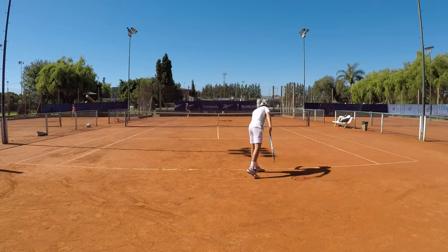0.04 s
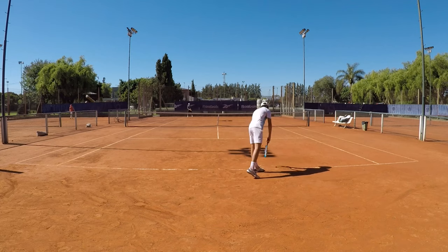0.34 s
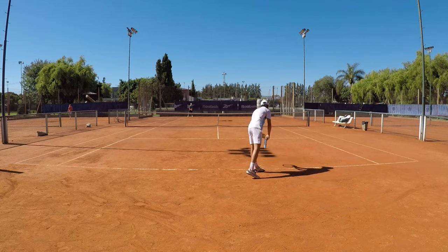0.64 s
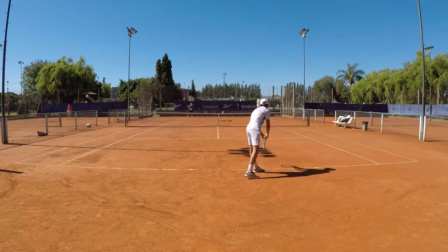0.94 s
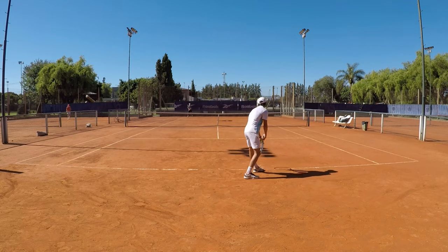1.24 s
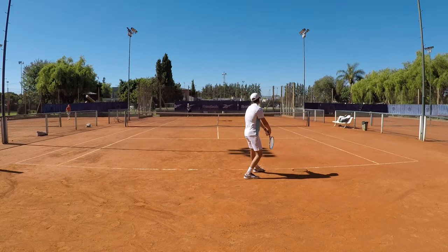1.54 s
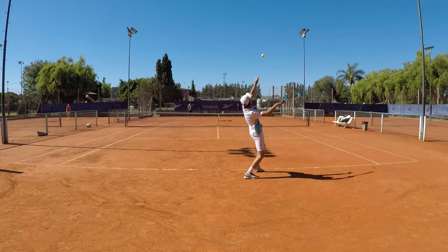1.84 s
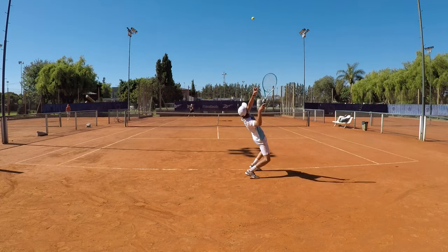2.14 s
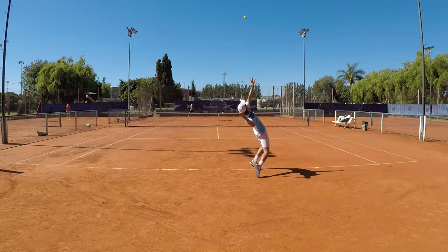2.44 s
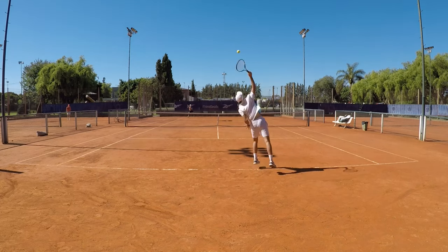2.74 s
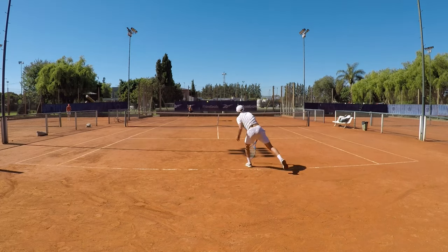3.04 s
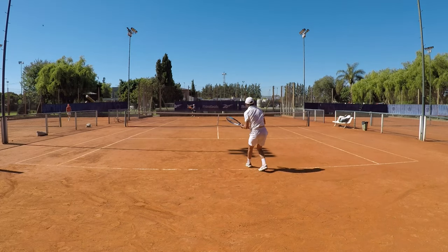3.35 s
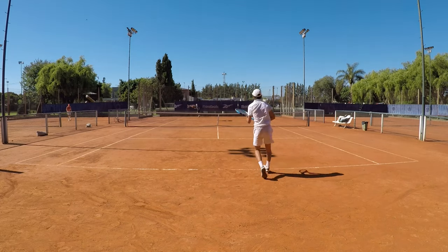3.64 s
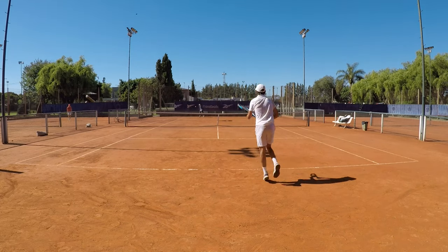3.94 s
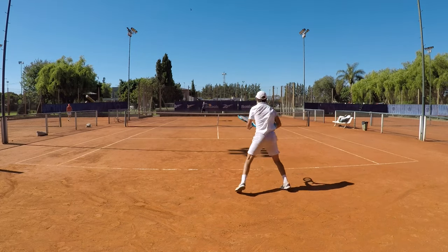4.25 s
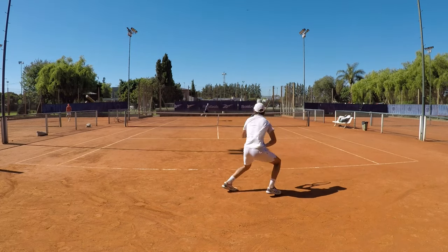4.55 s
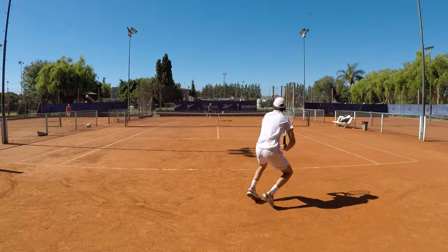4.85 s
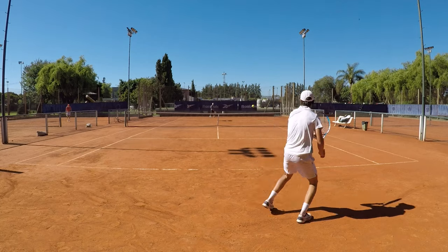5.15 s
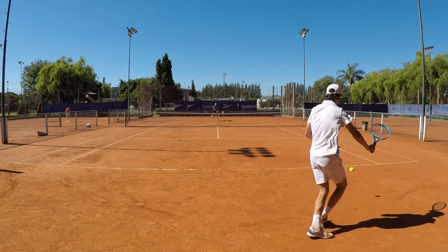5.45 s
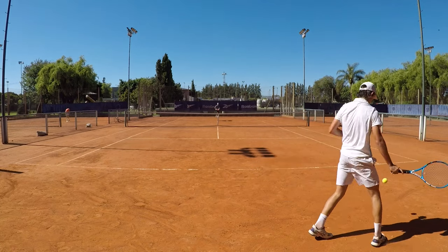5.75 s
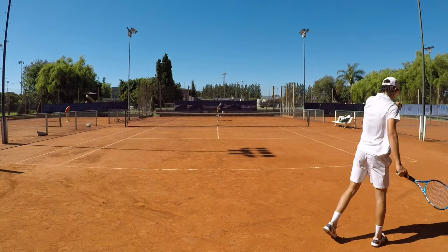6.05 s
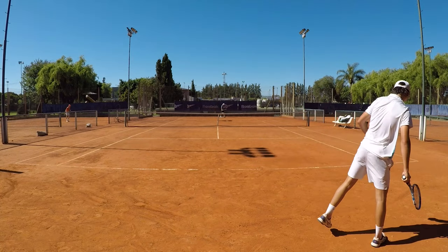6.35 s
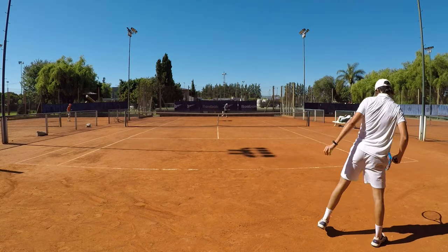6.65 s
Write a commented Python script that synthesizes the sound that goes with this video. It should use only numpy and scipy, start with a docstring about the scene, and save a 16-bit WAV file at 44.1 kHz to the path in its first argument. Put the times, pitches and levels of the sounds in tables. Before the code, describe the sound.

On an outdoor clay court, wind rumbles on the microphone over a hiss of leaves and a faint, distant machine hum. After a soft ball bounce and a pause, a tennis serve cracks loudly, with a racket swish and dull echoes. Shoes scuff and land on the grit. The ball then bounces close by on the right, is knocked by the racket and bounces again, before a low gust at the end.

```python
"""Tennis on an outdoor clay court

A player serves, lands, split-steps and stops the returned ball with his racket. Racket, ball and
soles ring in damped modes when struck; eddies whistle off the swung frame, and shoes scuff the grit.
Fences and trees send back dull echoes. Wind rumbles on the microphone over a hiss of leaves and
the hum of a far machine."""
import sys
import numpy as np
from scipy import signal
from scipy.fft import rfft, irfft, next_fast_len
from scipy.io import wavfile

SR = 44100
rng = np.random.default_rng(int(sys.argv[2]) if len(sys.argv) > 2 else 0)


def digitize_waveform(pressure):
    """Quantize a signal to 16-bit integers and store it at the path in sys.argv[1].

    Rows of a 2-D input are taken as channels; values are limited to [-1, 1].
    """
    field = np.atleast_2d(pressure).T
    bounded = np.clip(field, -1, 1)
    quanta = np.round(bounded * 32767).astype(np.int16)
    wavfile.write(sys.argv[1], SR, quanta)


N = 304411
T = np.arange(N) / SR

# Noise spectra: frequency_hz, relative_density_db
LEAF_SPECTRUM = [(150, -4.5), (380, 2.5), (560, -0.5), (700, -5.5), (950, -4), (1500, -10.5), (2200, -17),
                 (4000, -23.5), (5000, -25), (6300, -18), (8000, -26), (12500, -38.5), (15000, -51)]
WIND_SPECTRUM = [(15, -13), (25, -9), (45, -2), (65, 0), (95, -7.5), (135, -7), (170, -10.5), (240, -16.5),
                 (320, -24.5), (500, -41), (900, -82)]
EDDY_SPECTRUM = [(15, -40), (35, -7), (65, -1), (130, -9.5), (220, -27.5), (450, -50), (1200, -100)]
ECHO_SPECTRUM = [(150, 1), (400, -1.5), (620, 0), (1250, -7.5), (2000, -7), (4000, -3.5), (7000, -12),
                 (14000, -45)]
GRIT_SPECTRUM = [(400, 0.5), (1000, 4.5), (2000, 5), (3800, 3.5), (6500, 4), (8500, -5), (11000, -18),
                 (15000, -37)]
CRACK_SPECTRUM = [(300, 1), (850, 9), (1300, 9), (1800, -4), (2800, -1.5), (3900, -1), (6300, 3.5),
                  (7600, 0.5), (9000, -7.5), (12000, -17.5), (15500, -31)]
# Left-right likeness of wind and leaves: frequency_hz, coherence
AIR_COHERENCE = [(30, 0.8), (65, 0.76), (130, 0.94), (290, 0.96), (450, 0.75), (800, 0.033), (1400, 0.035),
                 (3900, 0.61), (6000, 0.083), (10000, 0.024)]
# Partials of the far machine: pitch_hz, rms_db
HUM_PARTIALS = [(64.5, -36.5), (241, -46.5), (388, -55), (493, -42), (591.5, -55.5), (1459, -68.5)]
# Breeze on the microphone: time_s, level_db, left_db (always left level minus right)
BREEZE_CURVE = [(0.36, -25, 2), (0.41, -26.5, 0.5), (1.03, -24.5, 1), (1.69, -26.5, 0), (2.4, -26, 0.5),
                (2.82, -25, 1.5), (3.18, -22, 3), (3.49, -25.5, -0.5), (4.73, -26.5, 1), (4.89, -24.5, 0.5),
                (5.97, -25.5, -2), (6.33, -25.5, 1.5), (6.63, -26.5, 0), (6.9, -19, 5.5)]
# Eddies striking one microphone port more than the other: peak_s, level_db, length_s, left_db
EDDY_BUFFETS = [(0.858, -27.5, 0.26, 18.5), (1.163, -22.5, 0.091, 9), (1.44, -28.5, 0.23, 10),
                (1.863, -21.5, 0.23, 9), (2.384, -20, 0.11, 12.5), (2.508, -18, 0.06, -2),
                (2.955, -25, 0.054, -11), (3.15, -20, 0.17, 6.5), (5.048, -21, 0.14, 8),
                (5.464, -23, 0.068, -9), (5.736, -28, 0.042, -17), (5.926, -25, 0.39, 16),
                (6.843, -20, 0.25, 13)]
# Echoes after the serve: peak_s, level_db, centre_hz, width_octaves, left_db
ECHO_KNOCKS = [(2.847, -27, 900, .9, .5), (2.876, -36.5, 1080, .4, 0), (2.917, -39, 1150, .4, 0),
               (2.952, -40, 1250, .6, -1), (2.99, -42, 1200, .4, 0), (3.04, -40, 1080, .4, -1),
               (3.072, -40, 900, .7, -.5), (3.085, -38.5, 1200, .6, -.5), (3.185, -39, 1250, .25, -4)]
# Swells of noise: peak_s, level_db, length_s, tilt_db_per_octave
# At 2.523 and 2.603 s a faint, very high hiss before the serve; at 2.823 s the breathy rush of the
# racket's follow-through; the rest are shoes sliding on grit.
NOISE_SWELLS = [(2.072, -45.5, .015, 5), (2.523, -47, .04, 12), (2.588, -31.5, 0.079, -5.5),
                (2.603, -51, 0.16, 15), (2.663, -40, 0.037, -3.5), (2.683, -46, .018, 5),
                (2.823, -33.5, 0.073, -0.5), (2.946, -38, 0.013, -2), (2.969, -43.5, 0.025, -1),
                (3.035, -37, 0.047, -4), (3.133, -42, 0.017, 3), (3.193, -48.5, 0.082, 3),
                (3.346, -38, 0.061, 1), (3.366, -26, .02, -3.2), (3.38, -31, .018, -1.5),
                (3.402, -30.5, .006, -3), (3.73, -43.5, 0.028, 1.5), (4.293, -38.5, 0.068, -2),
                (4.328, -32, 0.018, -3), (4.495, -40, 0.09, -0.5), (4.497, -32, 0.016, -0.5),
                (4.516, -33, 0.012, -2), (4.668, -36, .008, -2.5), (4.701, -41.5, 0.03, 0),
                (4.721, -39.5, 0.033, -2.5), (4.843, -43, 0.028, -2.5), (4.921, -36, 0.024, -3),
                (4.936, -27, 0.013, -4), (5.004, -30, .008, -5), (5.019, -41.5, 0.046, -1),
                (5.279, -40.5, 0.0096, 8), (5.462, -47.5, 0.3, 2.5), (5.724, -41.5, 0.099, -2),
                (6.849, -44.5, 0.023, 1)]
# Coarse grains cracking under a sole: start_s, level_db
GRAIN_SNAPS = [(3.364, -29), (4.918, -30), (4.9305, -24), (4.936, -26), (4.9383, -29)]
# Three shoe landings, then a low gust thumping the microphone at 6.8085 s:
# start_s, ring_db, pitch_ratio, toe_share, thump_db, noise_db, cutoff_hz, left_db
LANDINGS_AND_GUST = [(4.193, -3, 1, 0.18, -9, -27, 4500, -0.5),
                     (4.213, -2.5, 0.93, 0.96, -10, -30.5, 4500, -2.5),
                     (5.062, -18, 0.8, 0.5, -16, -35, 1780, -4), (6.8085, -23, 0.713, 0, -18, -47, 446, 10)]
# Modes of a sole slapping the ground, lowered and dulled for the gust: pitch_hz, flat_db, toe_db, t60_s
THUD_MODES = [(344, 4.5, -1, 0.025), (445, 0.5, -6.5, 0.038), (765, -23, -13, 0.033),
              (830, -13, -6.5, 0.037), (1135, -10.5, -19, 0.059), (1315, -13, -8.5, 0.027),
              (1600, -13, -22, 0.033), (2350, -21, -27, .03), (3600, -11, -26, 0.028),
              (6300, -30, -19, .022)]
# Modes of a hollow tap: pitch_hz, relative_db, t60_s
TAP_MODES = [(1190, 1, .065), (1320, -0.5, .06), (1630, -2, .06), (1950, -4, .018)]
# Ball on clay: start_s, ring_db, pitch_ratio, steep_share, thump_db, noise_db, cutoff_hz, left_db
BALL_BOUNCES = [(.252, -11, 0.92, 0.04, -26, -50, 1000, -3), (5.4266, 0, 0.97, 0.04, -9, -31.5, 2280, -6),
                (5.6994, 1.5, 0.99, 1, -8.5, -29.5, 2290, -10.5)]
# Modes of the hollow ball: pitch_hz, glancing_db, steep_db, t60_s
BALL_MODES = [(351, -13, -20, 0.02), (480, -20, -19.5, 0.027), (1065, -16.5, -15.5, 0.02),
              (1255, -10, -24.5, 0.029), (1430, -25, -17, 0.019), (1800, -20.5, -26, 0.026),
              (2400, -28, -17, 0.0076)]
# Air passing the racket: peak_s, level_db, length_s, pitch_hz, breath_share, glide_octaves_per_length
SWING_WHISTLES = [(2.688, -36, .028, 845, 0.3, -.1), (2.714, -39, .02, 775, .3, 0),
                  (2.74, -41, .024, 900, .5, .16), (2.8415, -16, 0.0205, 395, 0.02, -.24),
                  (2.872, -33, .035, 610, .45, -.12), (2.912, -31, .03, 570, .3, -.08)]
# Modes of the racket with the ball: pitch_hz, centre_hit_db, frame_hit_db, t60_s (before extra damping)
RACKET_MODES = [(243, -9.5, -16, 0.027), (372, -7, -12, 0.026), (535, -10, -12.5, 0.025),
                (750, -22, -26, .022), (885, -16.5, -23, 0.03), (1150, -23, -15, 0.03),
                (1346, -29, -12, 0.052), (1669, -23, -42, 0.09), (1943, -32, -28, .06),
                (2160, -25, -36, 0.045), (2439, -32, -27.5, 0.1), (3220, -29, -27, 0.035),
                (3510, -34, -25, .06), (3750, -16, -28, 0.028), (5700, -17, -19, 0.022),
                (6761, -27, -16, 0.03), (7150, -27, -18, .024)]
# Racket on ball: start_s, ring_db, crack_db, crack_t60_s, crack_cutoff_hz, off_centre_share,
# ground_delay_s, ground_echo_db, left_db
RACKET_STROKES = [(2.8028, 1.5, -14.5, 0.038, 13000, 0.01, .0085, -5, -0.5),
                  (5.576, -4, -20.5, 0.083, 9000, 0.94, 0.0034, -26, -6)]


def from_db(db):
    """Amplitude grows tenfold for every 20 dB."""
    return 10 ** (np.asarray(db) / 20)


def unit_rms(x):
    """Normalisation to a mean power of 1."""
    return x / np.sqrt(np.mean(x ** 2) + 1e-20)


def at_hz(points, hz):
    """Interpolation on a logarithmic frequency axis."""
    frequencies, values = np.transpose(points)
    return np.interp(np.log(np.maximum(hz, 1)), np.log(frequencies), values)


def panned(left_db):
    """A level difference between the channels gives direction."""
    return from_db(np.array([[.5], [-.5]]) * left_db)


def drift(rate_hz):
    """Interpolated random values wander with unit variance."""
    knots = rng.standard_normal(1024)
    return np.interp(T * rate_hz, np.arange(len(knots)), knots) / np.sqrt(2 / 3)


def noise(spectrum, coherence, size=N, tilt_db=0):
    """Coloured noise of unit rms; the balance of mid and side sets the stereo coherence."""
    padded = next_fast_len(size)
    hz = np.fft.rfftfreq(padded, 1 / SR)
    alike = np.clip(at_hz(coherence, hz) if np.ndim(coherence) else coherence, 0, 1)
    octaves = np.log2(np.maximum(hz, 1) / 1000)
    gain = from_db(at_hz(spectrum, hz) + tilt_db * octaves) * (hz > 12)
    mid, side = rfft(rng.standard_normal((2, padded)))
    stereo = np.sqrt(1 + alike) * mid + np.sqrt(1 - alike) * side * [[1], [-1]]
    return unit_rms(irfft(gain * stereo, padded)[:, :size])


def lowpass(x, hz, order=2):
    """Attenuation above a corner frequency."""
    return signal.sosfilt(signal.butter(order, min(hz, .45 * SR), fs=SR, output="sos"), x)


def add(out, sound, start_s):
    """Superposition: a sound joins the mix at its start time."""
    at = round(start_s * SR)
    out[:, at:at + sound.shape[-1]] += sound[..., :N - at]


def ring(modes, t):
    """Free vibration is a sum of exponentially damped sines."""
    return sum(from_db(db - 60 * t / t60) * np.sin(2 * np.pi * hz * t) for hz, db, t60 in modes)


def blend(modes, share):
    """Modal excitation depends on the blow: levels lie between two manners of striking."""
    return [(hz, first + np.clip(share, 0, 1) * (second - first), t60) for hz, first, second, t60 in modes]


def burst(t, rise_s, t60):
    """An impact envelope builds during contact, then decays exponentially."""
    return np.minimum(0.19 + t / rise_s, 1) * from_db(-60 * np.maximum(t - rise_s, 0) / t60)


def swell(t, length_s, rise_share, shape):
    """An envelope peaking at t = 0, length_s wide at 1/e of its height."""
    distance_s = np.where(t < 0, -t / rise_share, t / (1 - rise_share))
    return np.exp(-(distance_s / length_s) ** shape)


def leaves(level_db=-38.5):
    """Countless leaves add incoherently to a nearly steady hiss."""
    return from_db(level_db + .3 * drift(9)) * noise(LEAF_SPECTRUM, AIR_COHERENCE) * panned(-1.5)


def far_machine(waver_hz=1.113, waver_db=0.4):
    """Wind modulates the amplitude and frequency of each partial of a distant hum."""
    hum = np.zeros(N)
    for hz, rms_db in HUM_PARTIALS:
        amplitude = np.sqrt(2) * from_db(rms_db - waver_db * drift(16))
        pitch_hz = hz + waver_hz * drift(14)
        hum += amplitude * np.sin(2 * np.pi * np.cumsum(pitch_hz) / SR)
    return hum * panned(-1.2)


def wind(gain_db=0.4, lumps_db=1.0):
    """Turbulent pressure on the microphone: a rumble follows the breeze, and single eddies buffet it."""
    times_s, levels_db, lefts_db = np.transpose(BREEZE_CURVE)
    breeze_db = np.interp(T, times_s, levels_db) + lumps_db * np.array([drift(25), drift(25)])
    windward = panned(np.interp(T, times_s, lefts_db))
    rumble = from_db(gain_db + breeze_db) * windward * noise(WIND_SPECTRUM, AIR_COHERENCE)
    buffets = sum(from_db(db) * swell(T - peak_s, length_s, rise_share=0.53, shape=1.04) * panned(left_db)
                  for peak_s, db, length_s, left_db in EDDY_BUFFETS)
    return rumble + buffets * noise(EDDY_SPECTRUM, coherence=0.055)


def reverberation(x, near_db=-18, near_t60=0.68, far_db=-22, far_t60=3.6):
    """Diffuse scattering: near fences give a short dull tail, distant trees a faint long one."""
    t = T[:2 * SR]
    fences = from_db(near_db - 60 * t / near_t60) / np.sqrt(near_t60) * np.clip(t / 0.022 - .5, 0, 1)
    trees = from_db(far_db - 60 * t / far_t60) / np.sqrt(far_t60) * np.clip(t / 0.038 - .5, 0, 1)
    energy_scale = np.sqrt(2 * np.log(1000) / SR)
    response = noise(ECHO_SPECTRUM, coherence=0.85, size=len(t)) * np.hypot(fences, trees) * energy_scale
    dulled = lowpass(x, 2600)  # foliage absorbs the treble
    return signal.fftconvolve(dulled, response, axes=1)[:, :N]


def court_echoes(length_s=0.019):
    """Midrange noise knocks stand for the serve's scattering from fences and walls."""
    out, t = np.zeros((2, N)), T[:SR // 5] - .1
    for peak_s, level_db, hz, octaves, left_db in ECHO_KNOCKS:
        edge = 2 ** (abs(octaves) / 2)
        band = [(hz / edge / 4, -90), (hz / edge, 0), (hz * edge, 0), (hz * edge * 4, -90)]
        knock = swell(t, length_s, rise_share=0.54, shape=1.1) * noise(band, coherence=0.53, size=len(t))
        add(out, from_db(level_db) * knock * panned(left_db), peak_s + t[0])
    return out


def fence_slap(x, level_db=-23, delay_s=0.039, cutoff_hz=3000):
    """Reflection from the fence behind the baseline gives one echo, left and right exchanged."""
    out = np.zeros((2, N))
    add(out, from_db(level_db) * lowpass(x[::-1], cutoff_hz), delay_s)
    return out


def grainy_noise(size, tilt_db, clump_db=2.5, clumps_per_s=700):
    """Quick random amplitude modulation makes noise grainy, like crushed brick dust."""
    clumps = np.interp(T[:size] * clumps_per_s, np.arange(SR), rng.standard_normal(SR))
    hiss = noise(GRIT_SPECTRUM, coherence=0.66, size=size, tilt_db=tilt_db)
    return unit_rms(from_db(clump_db * clumps)) * hiss


def scuffs_and_rushes(start_s=2.25, end_s=7.4, shuffle_db=-56.5, spread_db=3.0, shuffles_per_s=14):
    """Friction noise of shuffling and sliding soles, a faint high hiss, and the follow-through's rush."""
    moving = np.clip(np.minimum(T - start_s, end_s - T) / 0.12, 0, 1)
    shuffling = moving * from_db(shuffle_db + spread_db * drift(shuffles_per_s))
    out = shuffling * grainy_noise(N, tilt_db=-1.5)
    t = T[:SR] - .5
    for peak_s, level_db, length_s, tilt_db in NOISE_SWELLS:
        envelope = swell(t, length_s, rise_share=0.49, shape=0.93)
        add(out, from_db(level_db) * envelope * grainy_noise(len(t), tilt_db), peak_s + t[0])
    return out * panned(-2)


def grain_snaps(t60=0.0055, cutoff_hz=5500):
    """Brittle fracture: coarse grains click under the player's weight."""
    out, t = np.zeros((2, N)), T[:SR // 50]
    for start_s, level_db in GRAIN_SNAPS:
        grit = noise(GRIT_SPECTRUM, coherence=1.0, size=len(t), tilt_db=-2)
        add(out, from_db(level_db - 60 * t / t60) * grit, start_s)
    return lowpass(out, cutoff_hz, order=4)


def impacts(events, modes, contact_s, thump_hz, thump_t60, thump_lag_s, noise_t60):
    """Impulsive excitation (ball or sole on clay, gust on microphone): modes, noise and a low thump."""
    out, t = np.zeros((2, N)), T[:SR // 5]
    pressing = np.minimum(t / contact_s, 1) ** 2
    for start_s, ring_db, pitch_ratio, manner, thump_db, noise_db, cutoff_hz, left_db in events:
        variations = rng.standard_normal((len(modes), 2))
        struck = [(hz * pitch_ratio * (1 + .012 * detune), db + offset_db, t60)
                  for (hz, db, t60), (detune, offset_db) in zip(blend(modes, manner), variations)]
        body = from_db(ring_db) * pressing * ring(struck, t)
        envelope = from_db(noise_db) * burst(t, rise_s=contact_s, t60=noise_t60)
        hiss = envelope * noise(GRIT_SPECTRUM, coherence=0.36, size=len(t))  # on clay, spraying grit
        thump = ring([(thump_hz, thump_db, thump_t60)], t)
        add(out, lowpass(body + hiss, cutoff_hz, order=1) * panned(left_db), start_s)
        add(out, thump * panned(left_db), start_s + thump_lag_s)
    return out


def hollow_tap(start_s=5.3218, level_db=-32, left_db=-13.5, contact_s=0.00043):
    """Damped resonance: a light, hollow tap rings briefly off to the right."""
    out, t = np.zeros((2, N)), T[:SR // 5]
    tap = from_db(level_db) * np.minimum(t / contact_s, 1) * ring(TAP_MODES, t)
    add(out, tap * panned(left_db), start_s)
    return out


def racket_swing(breath_rate_hz=130):
    """Vortex shedding from the frame makes a breathy tone that glides with the racket's speed."""
    out, t = np.zeros((2, N)), T[:SR // 2] - .25
    for peak_s, level_db, length_s, hz, breathiness, glide in SWING_WHISTLES:
        pitch_hz = hz * 2 ** (glide * np.clip(t / length_s, -1, 1))
        carrier = np.exp(2j * np.pi * np.cumsum(pitch_hz) / SR)
        eddies = (drift(breath_rate_hz) + 1j * drift(breath_rate_hz))[:len(t)] / np.sqrt(2)
        tone = np.imag((np.sqrt(1 - breathiness) + np.sqrt(breathiness) * eddies) * carrier)
        envelope = from_db(level_db) * swell(t, length_s, rise_share=0.52, shape=5.3)
        add(out, envelope * tone, peak_s + t[0])
    return out


def racket_hits(dwell_s=0.0029, release_s=0.00045, max_cycles=260, rattle=0.65, ground_hz=2200):
    """Strings bite the felt with a crack, then vibrate freely; the ground reflects both sounds."""
    out, t = np.zeros((2, N)), T[:SR // 4]
    flutter_depth = rattle * np.minimum(t / 0.005, 1)  # strings rub together, so each mode flutters
    for stroke in RACKET_STROKES:
        start_s, ring_db, crack_db, crack_t60, cutoff_hz, off_centre, echo_s, echo_db, left_db = stroke
        # ball and hand damp the racket, limiting each t60 to max_cycles periods
        modes = [(hz, db, min(t60, max_cycles / hz)) for hz, db, t60 in blend(RACKET_MODES, off_centre)]
        ringing = sum(ring([mode], t) * (1 + flutter_depth * drift(122)[:len(t)]) for mode in modes)
        body = from_db(ring_db) * np.minimum(t / release_s, 1) * ringing
        bite = lowpass(noise(CRACK_SPECTRUM, coherence=0.07, size=len(t)), cutoff_hz, order=3)
        crack = from_db(crack_db) * burst(t, rise_s=0.00035, t60=crack_t60) * bite
        for sound, at_s in ((crack, start_s), (body, start_s + dwell_s)):
            add(out, sound * panned(left_db), at_s)
            add(out, from_db(echo_db) * lowpass(sound, ground_hz) * panned(left_db), at_s + echo_s)
    return out


def scene():
    """Direct sound, reflections and background add by superposition."""
    ball = impacts(BALL_BOUNCES, BALL_MODES, contact_s=0.00037,
                   thump_hz=192, thump_t60=0.021, thump_lag_s=0.00283, noise_t60=0.14)
    thuds = impacts(LANDINGS_AND_GUST, THUD_MODES, contact_s=0.0039,
                    thump_hz=255, thump_t60=0.014, thump_lag_s=0.01136, noise_t60=0.11)
    direct = racket_hits() + ball + hollow_tap() + thuds
    direct += scuffs_and_rushes() + grain_snaps() + racket_swing()
    echoes = fence_slap(direct) + court_echoes() + reverberation(direct)
    return direct + echoes + wind() + leaves() + far_machine()


def record(dry):
    """Gating, clipping and band limiting: a silent start, peaks held at full scale, the top cut."""
    start_s, cutoff_hz = .172, 16100
    gate = np.clip((T - start_s) / .008, 0, 1) * np.clip((T[-1] - T) / .002, 0, 1)
    treble_cut = signal.cheby2(14, 70, cutoff_hz, fs=SR, output="sos")
    return signal.sosfilt(treble_cut, np.clip(dry * gate, -1, 1))


dry = scene()
out = record(dry)
digitize_waveform(out)
```